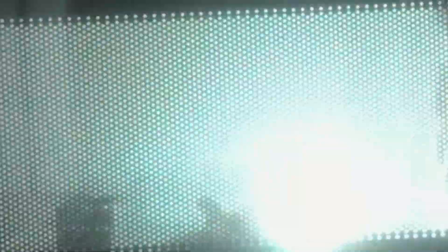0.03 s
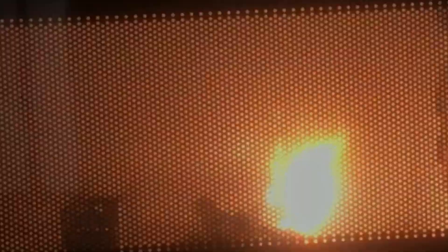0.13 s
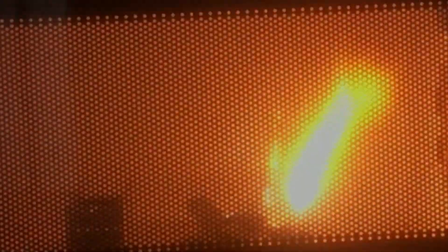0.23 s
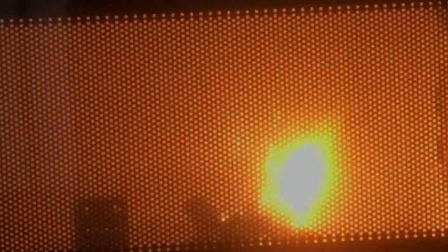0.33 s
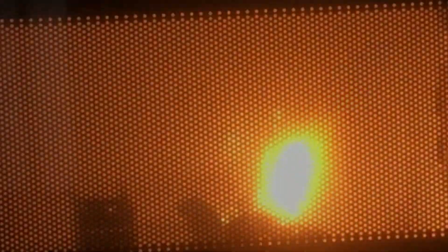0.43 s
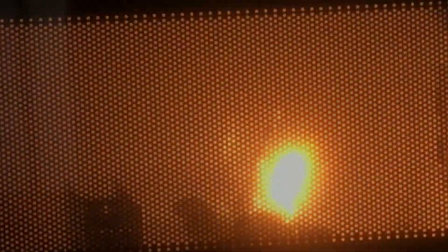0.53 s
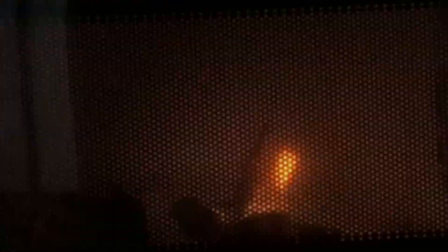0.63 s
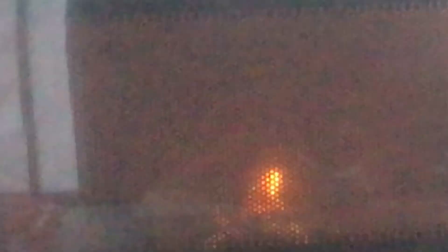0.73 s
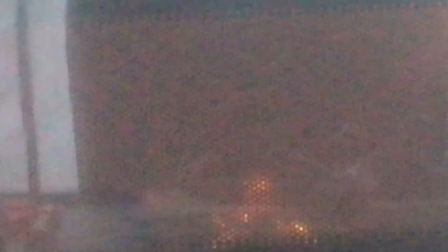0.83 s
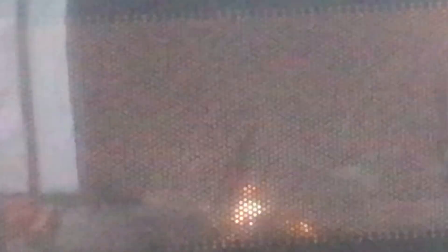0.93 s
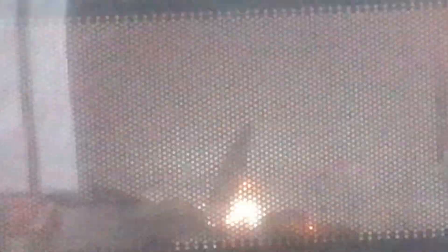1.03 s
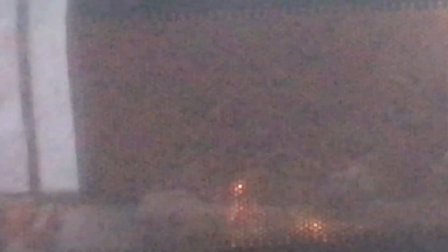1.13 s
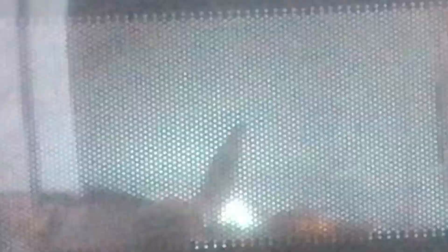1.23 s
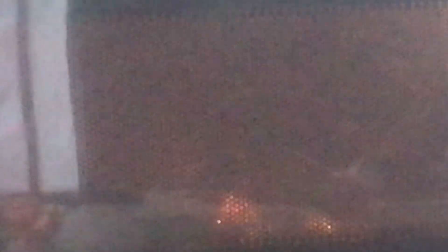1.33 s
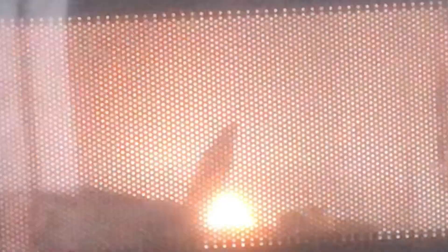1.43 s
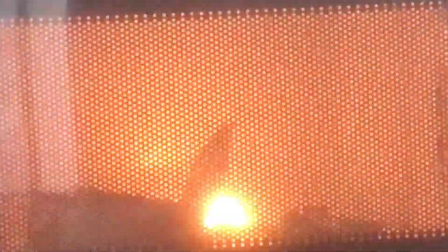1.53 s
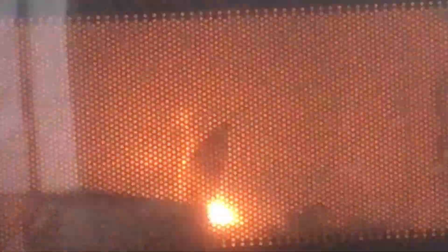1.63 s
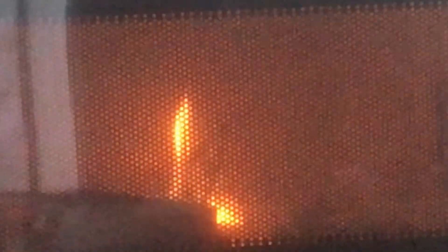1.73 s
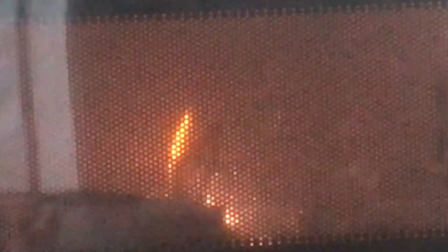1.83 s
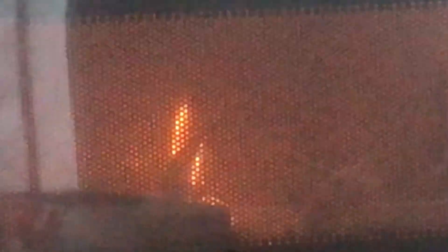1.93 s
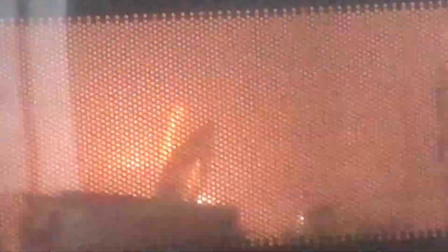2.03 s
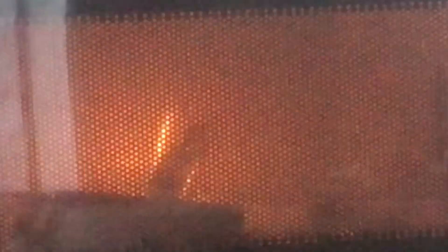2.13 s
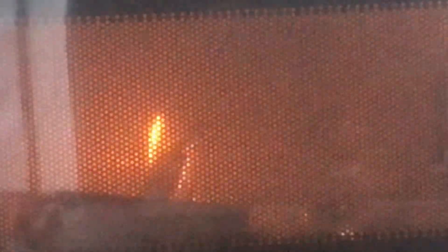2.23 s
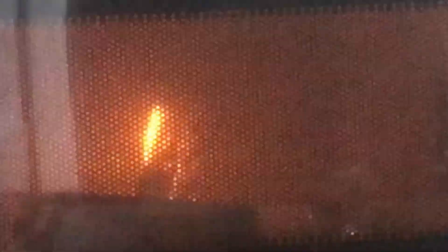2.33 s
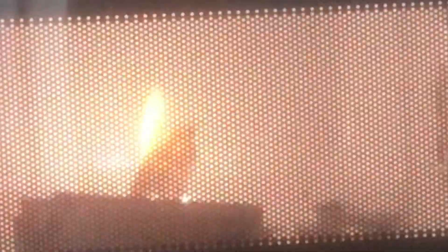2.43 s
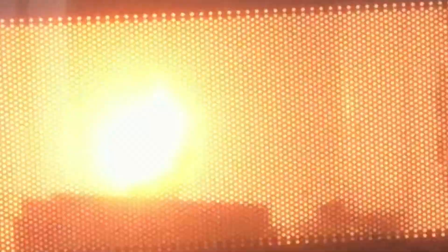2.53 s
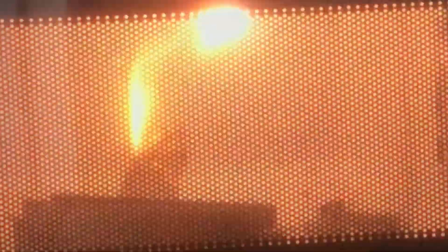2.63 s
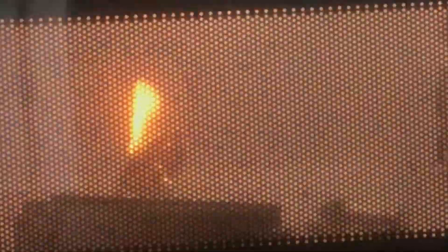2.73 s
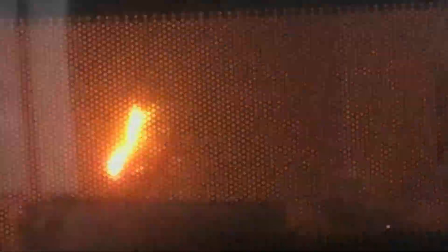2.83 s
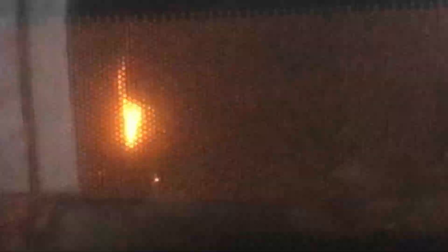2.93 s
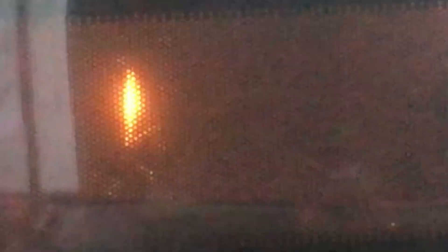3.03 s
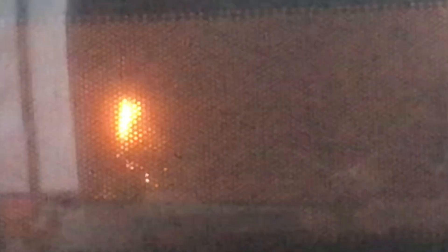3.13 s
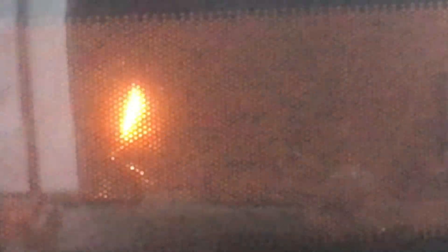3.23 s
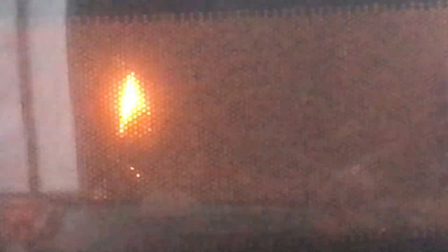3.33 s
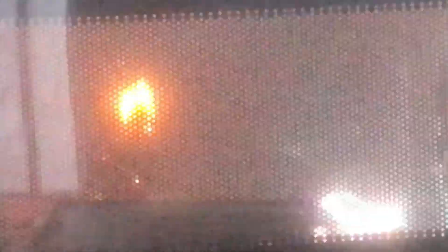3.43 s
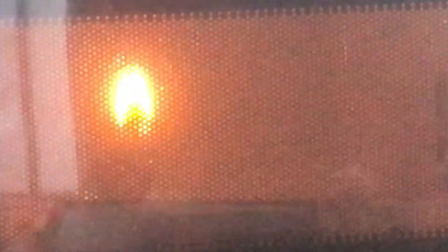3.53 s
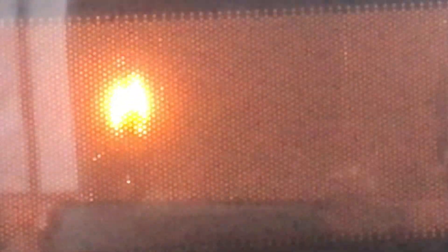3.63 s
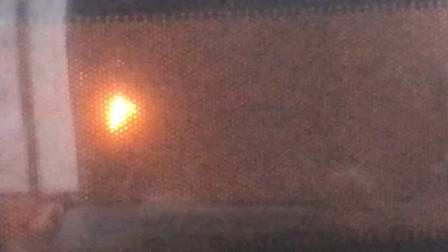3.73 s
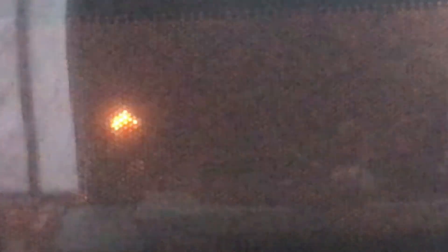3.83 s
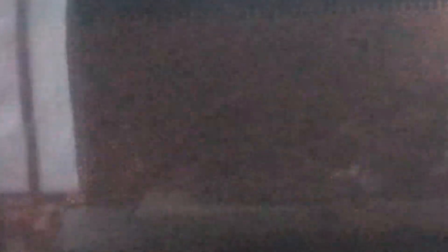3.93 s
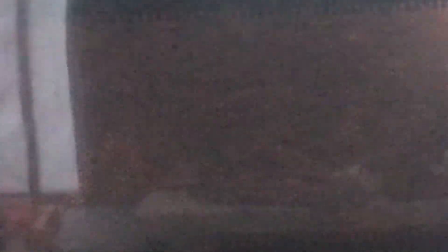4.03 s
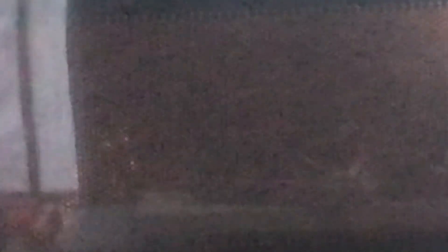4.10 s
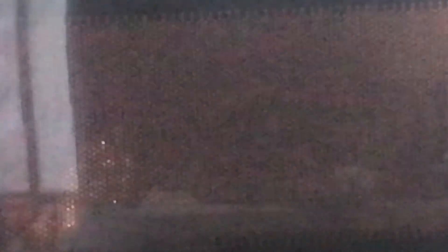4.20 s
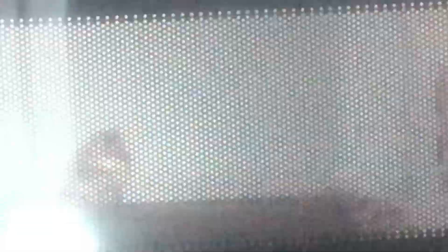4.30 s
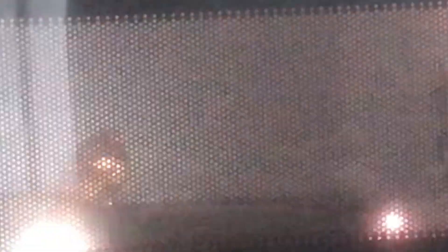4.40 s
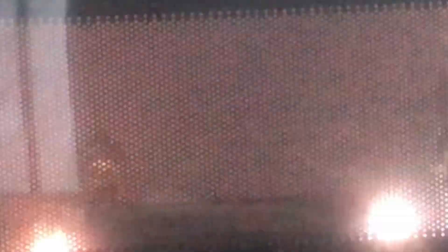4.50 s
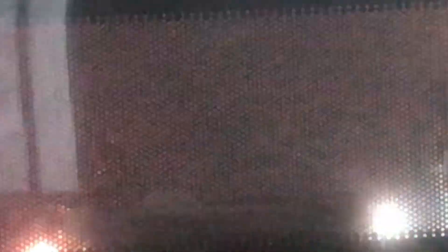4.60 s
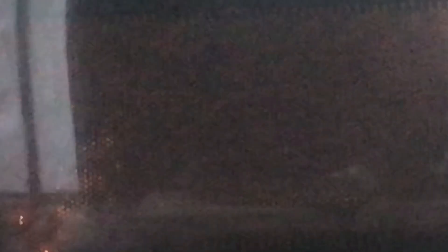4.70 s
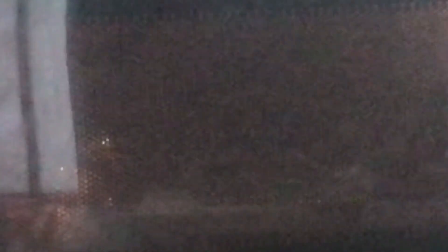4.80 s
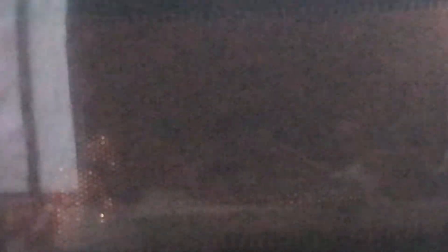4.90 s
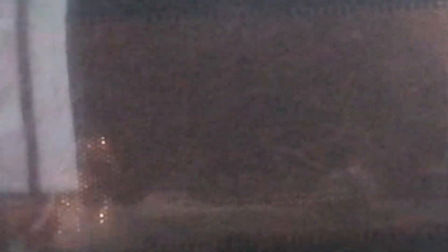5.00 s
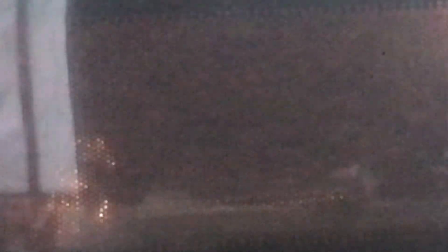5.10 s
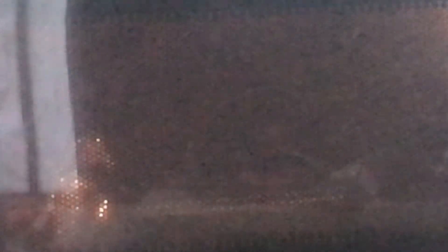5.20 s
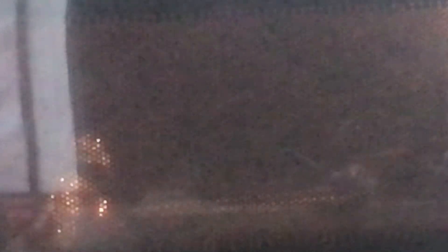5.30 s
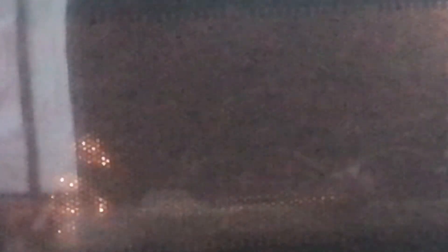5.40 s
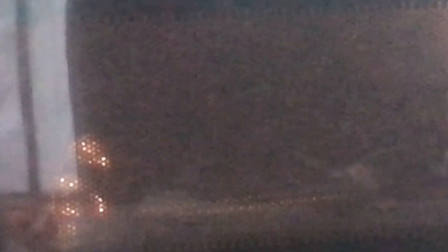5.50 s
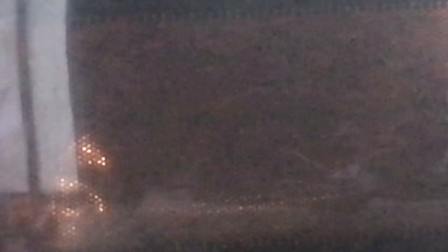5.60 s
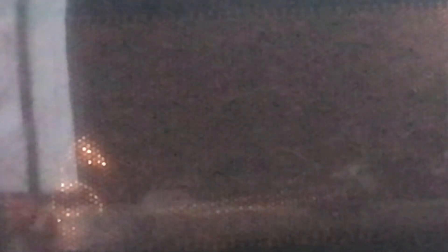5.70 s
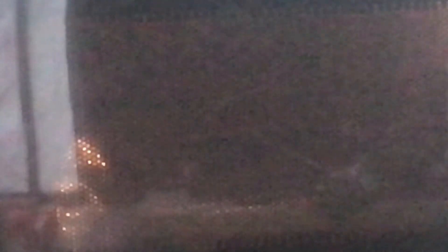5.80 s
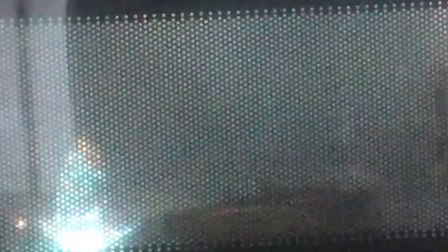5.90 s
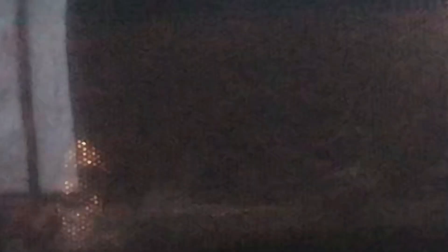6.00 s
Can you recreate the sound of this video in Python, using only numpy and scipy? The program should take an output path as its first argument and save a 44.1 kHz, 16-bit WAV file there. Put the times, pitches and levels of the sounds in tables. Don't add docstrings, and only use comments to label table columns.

```python
import sys
import numpy as np
from scipy import signal
from scipy.fft import rfft, irfft, next_fast_len
from scipy.io import wavfile
from scipy.ndimage import uniform_filter1d

SR = 44100
rng = np.random.default_rng(int(sys.argv[2]) if len(sys.argv) > 2 else 0)


def output_pcm(signal):
    pcm = np.clip(np.atleast_2d(signal).T, -1, 1) * 32767
    wavfile.write(sys.argv[1], SR, np.round(pcm).astype(np.int16))


def gain_from_db(level_db):
    decades = np.asarray(level_db, float) / 20
    return 10 ** decades


N = 266849
T = np.arange(N) / SR

MAINS_HZ, FIRES_AT = 49.92, .55
AIR_DB, AIR_SWELL_DB, MIC_HISS_DB = -62, .6, -74.5
RUMBLE_DB, LUMPY_DB = -55, 0.8
TICK_LOW_DB, TICK_THUMP_DB = -10.5, -3
RUN_LOW_DB, RUN_ENDS_DB = -7.5, -5
DULLS, QUIET_DB = 0.4, -54.5
CRACK_DB = -3
EDGE_HZ = 15790

# mains multiple, early level/dB, late level/dB
HUM_LINES = [(1, -66, -63), (2, -65, -62), (3, -66, -63), (4, -69, -71), (6, -77, -74), (8, -87, -85)]
# start t/s, end t/s
SETTLES_S = (2.2, 3.1)
# f/Hz, level/dB
FAN_TONES = [(157.07, -63), (314.1, -108), (628.4, -72.5), (942.6, -79.5), (1256.7, -86)]
# f/Hz, level/dB
AIR_COLOUR = [(140, -9), (230, -3), (291, -4.5), (378, -6), (592, -6), (615, -3), (671, -9.5), (938, -11.5),
              (1010, -8.5), (1600, -13.5), (1770, -16), (2520, -15.5), (2800, -21.5), (4500, -30),
              (5850, -61), (9900, -120)]
# f/Hz, level/dB
MIC_HISS_COLOUR = [(1760, -33), (3000, -5), (4100, -5.5), (4880, -7.5), (8440, -11.5), (10300, -14),
                   (13000, -9.5), (15800, -15)]
# f/Hz, level/dB
CASE_COLOUR = [(20, -30), (34, -14), (46, 0), (56, -5), (66, -1), (85, -9), (125, -11), (175, -21),
               (280, -45), (600, -110)]
# t/s, level/dB
BUZZ = [
    [(0.0, -43.5), (0.032, -42), (0.22, -42), (0.314, -42), (0.36, -40)],
    [(0.37, -51), (0.426, -50.5), (0.548, -48.5), (0.642, -59.5), (0.696, -61), (0.962, -64), (1.0, -90)],
    [(1.33, -76), (1.376, -58), (1.442, -49.5), (1.602, -54), (1.704, -76), (1.744, -61), (2.062, -57.5),
     (2.1, -62)],
    [(2.28, -57), (2.318, -53), (2.436, -61), (2.514, -40), (2.56, -46.5)],
    [(2.57, -46.5), (2.758, -46.5), (2.83, -69), (2.85, -58)],
    [(2.855, -55.5), (2.885, -49.5), (2.92, -65), (2.95, -77)],
    [(4.25, -51.5), (4.324, -54), (4.392, -81), (4.466, -45), (4.51, -52), (4.666, -44), (4.742, -57),
     (4.85, -56)],
]
# door/dB, walls/dB, roof/dB, case/dB
PART_PULL = [(-6.5, -10.5, -20, -7), (3, 0, 1, 1), (-8.5, -11.5, -12, -1), (-8, -14, -8, -5.5),
             (1.1, -10.5, -12, -18), (-15, -4.5, 8.5, -20), (-16, -18, -11, -13)]
# t/s, unevenness 0-1
UNSTEADY = [(0, .65), (.7, .65), (1, 1), (2.5, 1), (2.56, .25), (2.84, .25), (2.9, 1), (6.1, 1)]
# f/Hz, width/Hz, level/dB
PANEL_MODES = [(49.8, 30, -30), (102.4, 30, 1), (145.8, 37, 9)]
# f/Hz, width/Hz, level/dB
DOOR_MODES = [(199, 25.6, 4.5), (243, 16, -13)]
# f/Hz, width/Hz, level/dB
WALL_MODES = [(432, 19, -0.5), (562, 19, 0.5), (617.5, 26, 3.5), (689, 34, 3.5), (817, 110, 0),
              (958, 44, 5.5), (1058, 10, -2)]
# f/Hz, width/Hz, level/dB
ROOF_MODES = [(1340, 50, -18), (1371, 30, 10.5), (1472, 12, -2.5)]
# f/Hz, width/Hz, level/dB
THUMP_MODES = [(128, 8, 5), (166.4, 20, 0.5), (202, 18, -1.5)]
# t/s, sizzle level/dB
BURN = [
    [(0.0, -54.5), (0.15, -57.5), (0.324, -57), (0.372, -66), (0.488, -54.5), (0.648, -59.5), (0.72, -85)],
    [(0.93, -82), (1.06, -65.5), (1.124, -87), (1.176, -70.5), (1.282, -63.5), (1.35, -59.5), (1.552, -65),
     (1.828, -75.5)],
    [(1.83, -70.5), (1.92, -64), (1.97, -65), (2.072, -64), (2.245, -82)],
    [(2.25, -73), (2.33, -57.5), (2.5, -67), (2.612, -75.5), (2.84, -83)],
    [(4.17, -80), (4.202, -64), (4.326, -58), (4.392, -64), (4.516, -50), (4.67, -57.5), (4.75, -100)],
    [(4.76, -84.5), (4.9, -88), (4.99, -79.5), (5.086, -81), (5.366, -84), (5.5, -97)],
]
# near 1.3 kHz/dB, near 2.5 kHz/dB, above 7.5 kHz/dB
BURN_COLOUR = [(1.5, 2.7, 3), (-9, 1, 4), (2.5, 1.3333, 2.5), (2, 1.9, 3), (-4.5, 2.5, 6.5), (-8, 1.1, 5.5)]
# t/s, peak level/dB, below 3 kHz against it/dB, above 7.5 kHz against it/dB, thump level/dB
SNAPS = [(0.1484, -55.5, -2, 6.5, -41), (0.2548, -49, -12, -5, -49), (1.3756, -40.5, -10.5, -4.5, -41),
         (1.4133, -41.5, -11.5, -2.5, -62), (1.8978, -49.5, -26, 1.5, -51.5),
         (2.0552, -55.5, -3.5, 2.5, -51.5), (2.3156, -55.5, -8, 3, -46.5), (2.4962, -52.5, -5, 7.5, -40.5),
         (2.8587, -47, -9.5, 1.5, -40), (2.8799, -44.5, -10.5, -3.5, -39), (2.8991, -56.5, 1, 0, -51),
         (4.303, -45.5, -1.5, -4, -41), (4.3202, -42.5, -2, -6, -40.5), (4.3416, -48.5, -1.5, -9, -46),
         (4.418, -48.5, -2.5, -3, -45), (4.4612, -43, -8, -2, -38.5), (4.4993, -45, -16, -4, -60),
         (4.5557, -48.5, -9, -4, -43.5), (4.595, -47.5, -8, 5, -44), (4.62, -57, 2.5, -12, -52),
         (4.6574, -47.5, -8.5, -7, -51)]
# t/s, peak level/dB, above 7.5 kHz against it/dB
TICKS = [(0.054, -51, -5), (0.9326, -62, -2.5), (0.9506, -60, -1.5), (1.0086, -58, 0), (1.0517, -63, -1),
         (1.136, -60.5, -1.5), (1.1922, -67, 3), (1.276, -57, -8), (1.3186, -65, -4), (1.8547, -63, 0.2),
         (2.0194, -59.5, -10), (2.0936, -73, 6), (4.0962, -63.5, 2), (4.521, -57, -5), (4.7973, -57, 0)]
# start t/s, length t/s, peak level/dB, above 7.5 kHz against it/dB, thump level/dB
RUNS = [
    (0.28, 0.021, -50, -6, -67),
    (0.4086, 0.047, -71, -6, -47),
    (0.5707, 0.072, -63, 2, -40.5),
    (2.275, .025, -65, -14, -61),
    (2.3707, .085, -52.5, 3.2, -47),
    (3.4378, .079, -55, -1.5, -55.5),
    (4.1797, .085, -56.5, 0, -58),
    (5.8624, 0.11, -50.5, 1.7, -48.5),
]
BANDS_HZ = [900, 1750, 3300, 7400, 10400, 17500]
# f/Hz, level/dB
ARC_COLOUR = [(700, 1), (1000, -11.5), (1350, 0.5), (1680, -2.5), (2100, -3), (3100, -3.5), (3550, -2),
              (4200, 3), (6400, 2.5), (7560, -7.5), (9360, -3.5), (10500, -9.5), (12700, -7.5),
              (15200, -12)]
# f/Hz, width/Hz, level/dB
CAVITY_MODES = [(1350, 44, 8.5), (2490, 47, 4), (3660, 196, 17), (4300, 350, -7), (5220, 140, 9.5),
                (6440, 75, 8.5), (9900, 200, -8.5)]
# f/Hz, t/s
CAVITY_T60 = [(1000, 0.12), (4000, 0.13), (9000, 0.075), (15000, 0.14)]


def evened(x):
    return x / np.sqrt(np.mean(x ** 2) + 1e-20)


def read(points, hz):
    f, value = np.transpose(points)
    return np.interp(np.log(hz + 1), np.log(f + 1), value)


def coloured(x, points):
    n = next_fast_len(len(x))
    gain = gain_from_db(read(points, np.fft.rfftfreq(n, 1 / SR)))
    return irfft(rfft(x, n) * gain, n)[:len(x)]


def drift(top_hz):
    t = T[::256]
    rates = np.geomspace(.2, top_hz, num=16)
    slow = sum(np.sin(2 * np.pi * (f * t + rng.random())) / np.sqrt(f) for f in rates)
    return np.interp(T, t, evened(slow))


def filtered(x, order, hz, kind):
    return signal.sosfilt(signal.butter(order, hz, kind, fs=SR, output="sos"), x)


def spells(tables, offsets):
    rows = []
    for table, offset in zip(tables, offsets):
        rows += [(s, db, *(db + np.array(offset))) for s, db in table]
    rows = np.array(rows)
    sounding = sum((T >= r[0][0]) & (T <= r[-1][0]) for r in tables) > 0
    mute_db = np.where(sounding, 0, -100)
    return [np.interp(T, rows[:, 0], column) + mute_db for column in rows.T[1:]]


def clicks(s, size):
    x = np.zeros(N)
    np.add.at(x, np.clip(np.round(s * SR).astype(int), 0, N - 1), size)
    return x


def ring(modes):
    t = T[:SR // 4]
    return sum(gain_from_db(db) * np.exp(-np.pi * width * t) * np.sin(2 * np.pi * hz * t) for hz, width, db in modes)


def struck(blows, modes, soft_s):
    soft = signal.windows.hann(round(soft_s * SR))
    return signal.oaconvolve(blows, np.convolve(ring(modes), soft / soft.sum()))[:N]


def hum():
    levels = [(k, np.interp(T, SETTLES_S, db) + 0.65 * drift(1.9)) for k, *db in HUM_LINES]
    out = np.zeros(N)
    for k, db in levels:
        out += gain_from_db(db) * np.sin(2 * np.pi * (k * MAINS_HZ * T + rng.random()))
    speed = np.cumsum(1 + 0.00023 * drift(1.35)) / SR
    for hz, db in FAN_TONES:
        out += gain_from_db(db + 0.31 * drift(2.2)) * np.sin(2 * np.pi * (hz * speed + rng.random()))
    return np.sqrt(2) * out


def fan_air(rumble_db=-1):
    air = evened(coloured(rng.standard_normal(N), AIR_COLOUR))
    mic_hiss = evened(coloured(rng.standard_normal(N), MIC_HISS_COLOUR))
    rumble = coloured(rng.standard_normal(N), CASE_COLOUR)
    rumble = rumble / np.sqrt(abs(uniform_filter1d(rumble ** 2, SR // 4)))
    shaken_db = spells(BUZZ, PART_PULL)[-1]
    swell = np.hypot(gain_from_db(RUMBLE_DB + LUMPY_DB * drift(8.3)), gain_from_db(shaken_db))
    moving_air = gain_from_db(AIR_DB + AIR_SWELL_DB * drift(3.04)) * air
    return moving_air + gain_from_db(MIC_HISS_DB) * mic_hiss + gain_from_db(rumble_db) * swell * rumble


def sparks():
    rows = list(SNAPS)
    rows += [(s, db, TICK_LOW_DB, high, db + TICK_THUMP_DB) for s, db, high in TICKS]
    for start, length, db, high, thump in RUNS:
        s = np.arange(0, length, 1 / MAINS_HZ)
        shape = RUN_ENDS_DB * (2 * s / length - 1) ** 2
        rows += [(start + a, db + b, RUN_LOW_DB, high, thump + b) for a, b in zip(s, shape)]
    return np.transpose(rows)


def box(thump_db=-2, knock_db=-16, roof_db=-20, buzz_db=(0, 0, -3, -3), late_s=(.0006, .0004, .0003, .0003)):
    s, *_, db = sparks()
    cycles = np.arange(-1, 303)
    at = np.clip((cycles + FIRES_AT + 0.1584) / MAINS_HZ, 0, T[-1])
    chance = rng.standard_normal((len(cycles), 8))
    chance *= np.interp(at, *np.transpose(UNSTEADY))[:, None]
    levels = spells(BUZZ, PART_PULL)
    pulls = []
    for k in range(4):
        size = gain_from_db(levels[k][(at * SR).astype(int)] + buzz_db[k])
        pulls.append(clicks(at + late_s[k] * chance[:, k + 4], size * gain_from_db(2.5 * chance[:, k])))
    panels, door, walls, roof = pulls
    panels = panels + 0.26 * np.roll(panels, round(0.0079 * SR))

    thump = struck(clicks(s, gain_from_db(db + thump_db)), THUMP_MODES, 0.0053)
    low = struck(panels, PANEL_MODES, 0.0057) + struck(door, DOOR_MODES, 0.0039) + thump
    rattle = struck(walls + clicks(s, gain_from_db(db + knock_db)), WALL_MODES, 0.0013)
    ping = struck(roof + clicks(s, gain_from_db(db + roof_db)), ROOF_MODES, 0.00086)
    return low + filtered(rattle, 4, 370, "highpass") + filtered(ping, 4, 1100, "highpass")


def cavity(x, direct=0.11):
    out, t = direct * x, T[:SR // 4]
    for k in range(7):
        hz, s, z = signal.stft(rng.standard_normal(len(t)), SR, nperseg=128)
        fade = gain_from_db(-60 * s / read(CAVITY_T60, hz)[:, None])
        echoes = signal.istft(z * fade, SR, nperseg=128)[1][:len(t)]
        modes = ring(np.array(CAVITY_MODES) * [1 + .003 * (k - 3), 1, 1])
        tail = echoes / np.linalg.norm(echoes) + gain_from_db(-12) * modes / np.linalg.norm(modes)
        away = (15 * T - k + 3.5) % 7 - 3.5
        here = np.cos(np.pi / 2 * np.clip(away, -1, 1))
        out = out + signal.oaconvolve(x * here, tail)[:N]
    return out


def arcs(spark_s=0.0059, spark_db=3, flutter_db=1.5, top_db=0.5, deep_db=-5):
    s, db, low, high, _ = sparks()
    burn_db, burn_deep, burn_low, burn_high = spells(BURN, BURN_COLOUR)
    turns = MAINS_HZ * T - FIRES_AT
    cycle_db = flutter_db * rng.standard_normal(400)[np.floor(turns).astype(int) + 1]
    firing = np.where(turns % 1 < .45, 1, .6) * gain_from_db(cycle_db)
    burst = np.exp(-T[:1500] / spark_s)
    top = high + top_db - DULLS * (db - QUIET_DB)
    spark_bands = (low + deep_db, low, 0, high, top)
    burn_bands = (burn_deep - 6, burn_low - 6, burn_db, burn_high - 3, burn_high - 3)
    hiss = np.zeros(N)
    for k, (spark, burn) in enumerate(zip(spark_bands, burn_bands)):
        power = abs(signal.oaconvolve(clicks(s, gain_from_db(2 * (db + spark + spark_db))), burst)[:N])
        power = power + (gain_from_db(burn) * firing) ** 2
        noise = coloured(rng.standard_normal(N), ARC_COLOUR)
        hiss += evened(filtered(noise, 2, BANDS_HZ[k:k + 2], "bandpass")) * np.sqrt(power)
    front = filtered(clicks(s, gain_from_db(db + high + CRACK_DB)), 2, 2500, "highpass")
    return cavity(hiss) + front


def scene():
    return (arcs() + box() + hum() + fan_air())[None]


def low_pass(x):
    return signal.sosfilt(signal.butter(12, 16730, fs=SR, output="sos"), x)


def record(dry):
    edge = signal.firwin(1001, EDGE_HZ, window=("kaiser", 8), fs=SR)[None]
    mix = signal.oaconvolve(filtered(dry, 4, 36, "highpass"), edge, "same")
    return low_pass(mix)


dry = scene()
out = record(dry)
output_pcm(out)
```